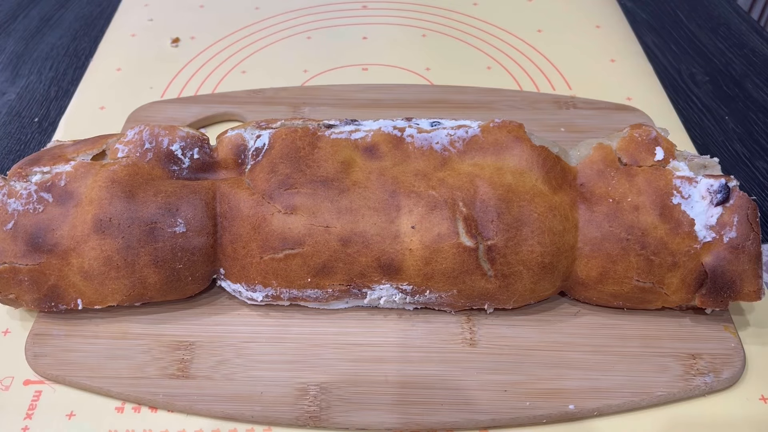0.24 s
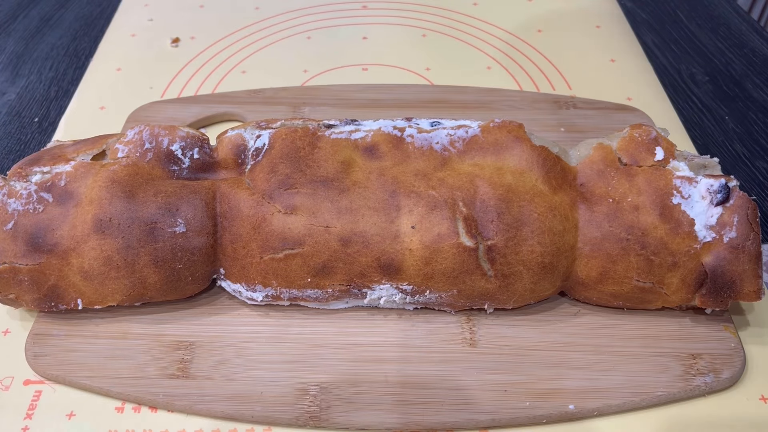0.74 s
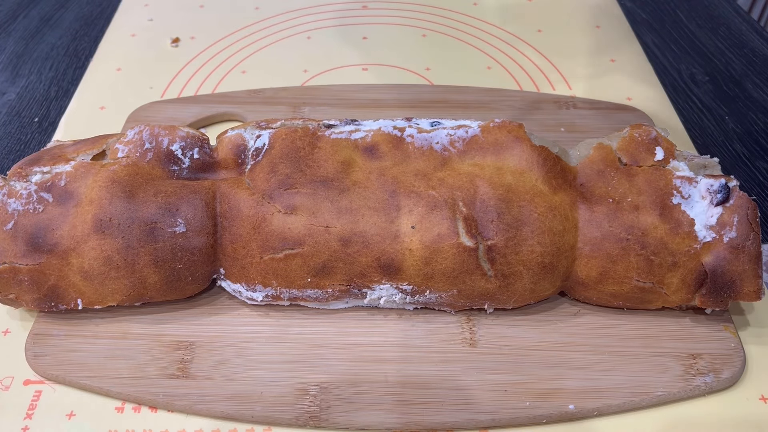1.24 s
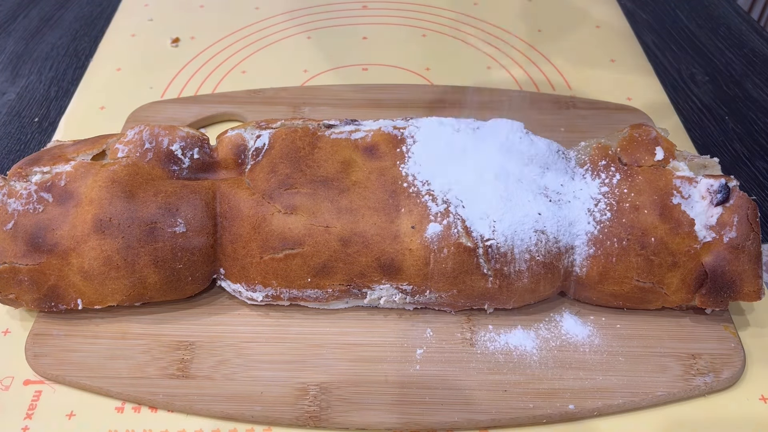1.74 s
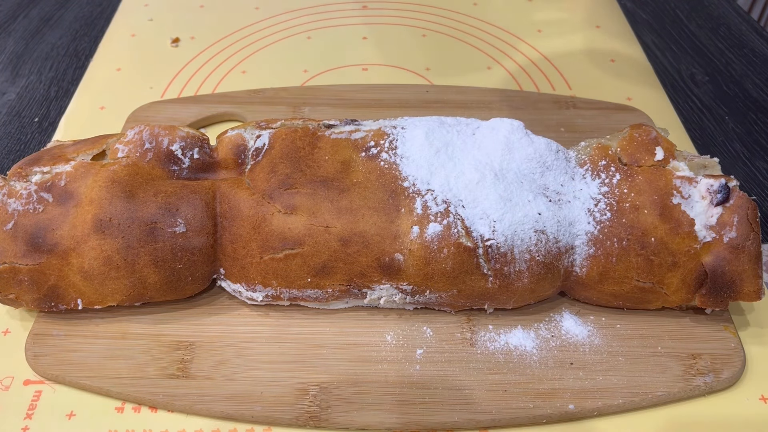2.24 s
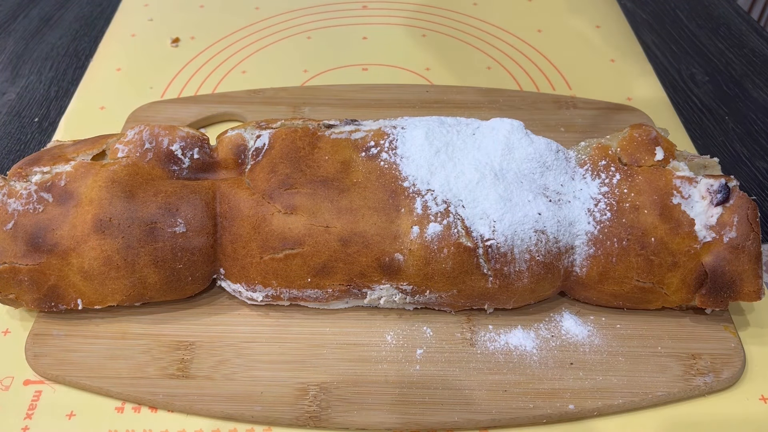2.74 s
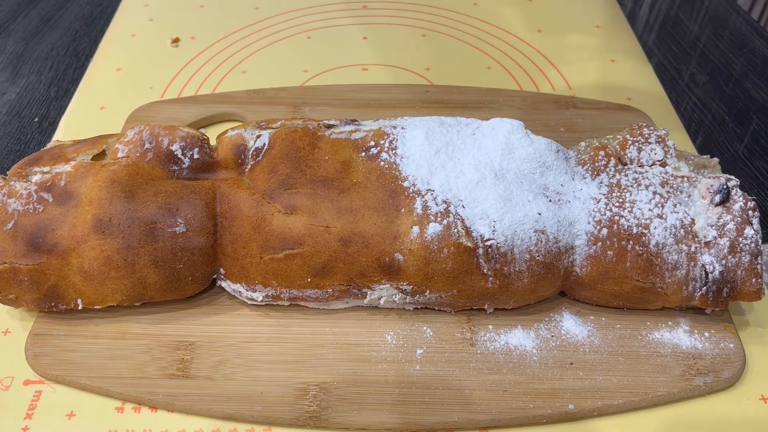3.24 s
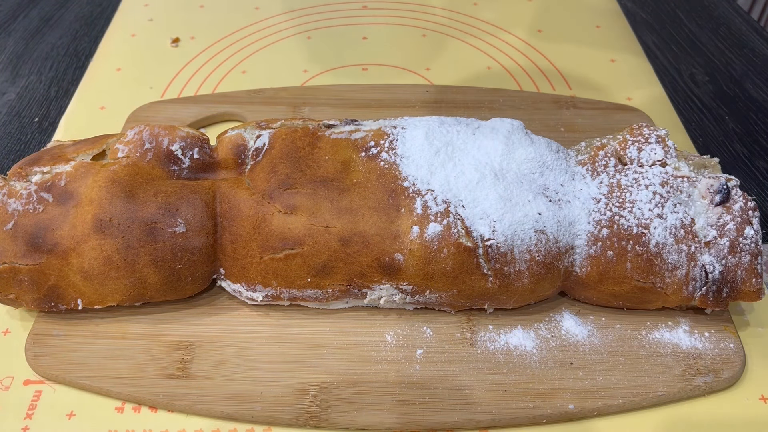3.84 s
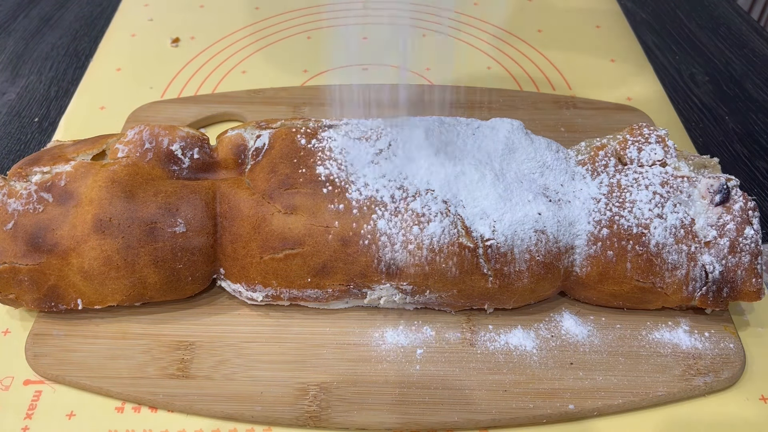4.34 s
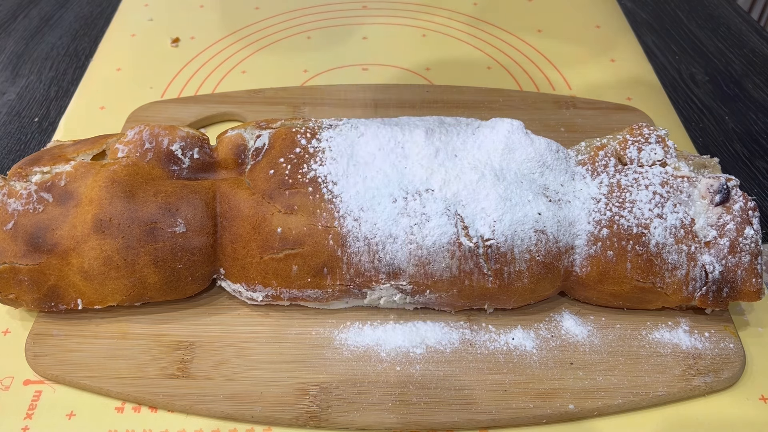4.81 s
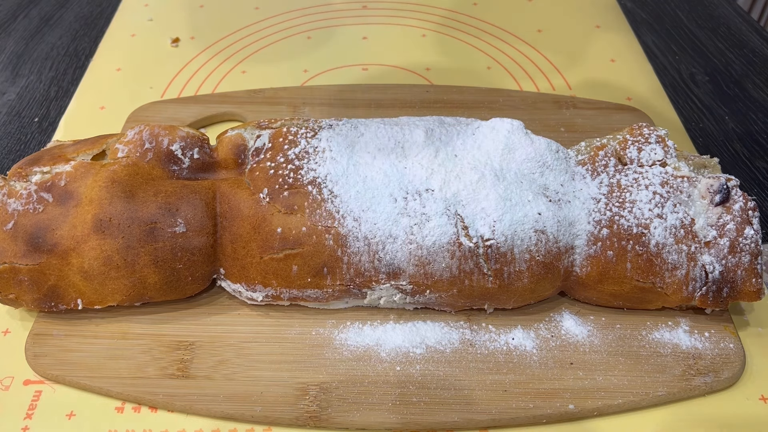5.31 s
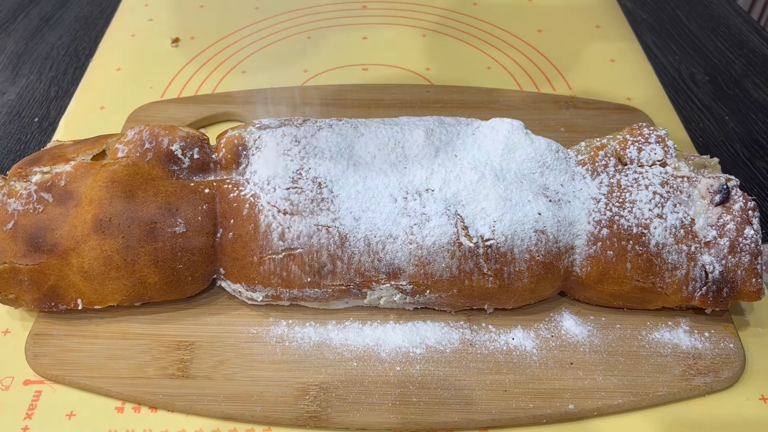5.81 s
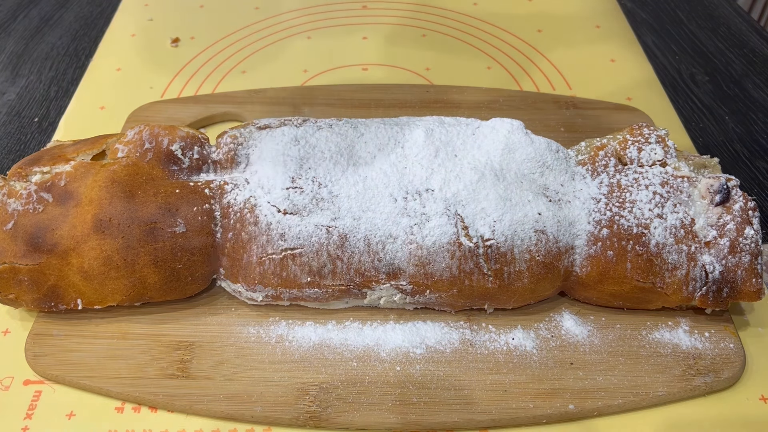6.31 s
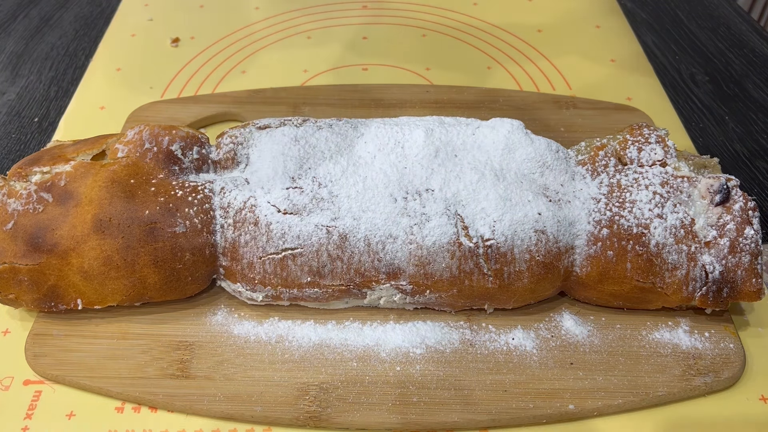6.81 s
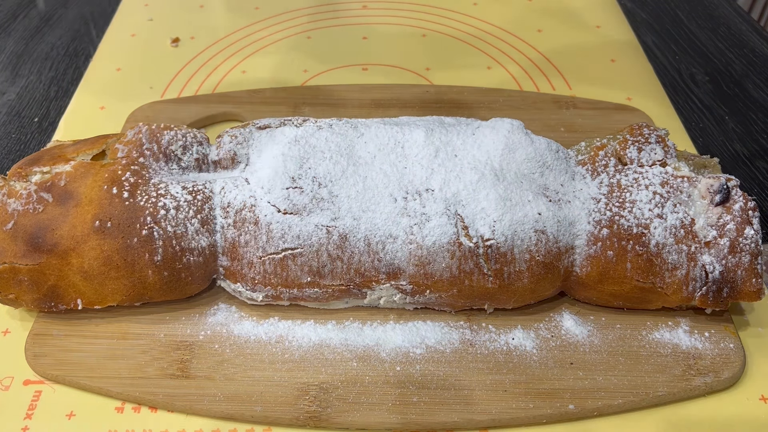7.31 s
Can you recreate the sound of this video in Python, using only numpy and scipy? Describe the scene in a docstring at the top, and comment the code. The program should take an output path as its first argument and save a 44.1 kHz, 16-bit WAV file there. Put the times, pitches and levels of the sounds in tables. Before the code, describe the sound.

A small metal sifter is tapped a few times, then shaken in steady uneven light clicks and rattles with grainy sugar hiss, close in a kitchen.

```python
"""In a kitchen, close above a phone's two microphone ports: first cloth and hands rustle and scuff, with two dull bumps.
From 1.1 s a small metal sugar sifter is tapped, and from 2.7 s shaken to and fro over a baked roll, drifting left.
Each jolt is a ragged push that rings cup, rim and mesh, with a grainy skitter of sugar and loose parts around it.
Sliding sugar hisses over the mesh and swishes along the rim; near the end the rustle and a scuff return.
A quiet hum, shaped noise from the left, runs throughout. Table levels are those before the microphone response."""
import sys
import numpy as np
from scipy import signal
from scipy.fft import rfft, irfft, next_fast_len
from scipy.io import wavfile
from scipy.ndimage import map_coordinates

SR = 44100
rng = np.random.default_rng(int(sys.argv[2]) if len(sys.argv) > 2 else 0)


def int16_out(signal):
    """Quantize to a 16-bit WAV file."""
    q = np.round(np.clip(np.atleast_2d(signal).T, -1, 1) * 32767)
    wavfile.write(sys.argv[1], SR, q.astype(np.int16))


N = 333396


def amp(db):
    """Amplitude factor for a level in dB."""
    return 10 ** (np.asarray(db) / 20)


def unit(x):
    """Scale to an rms of 1."""
    return x / np.sqrt(np.mean(x ** 2) + 1e-20)


def along(points, hz):
    """Read (f/Hz, value) points on a log frequency axis."""
    f, values = np.transpose(points)
    return np.interp(np.log(hz + 1), np.log(f + 1), values)


def curves(rows):
    """One value per sample for each column after the time."""
    times, *columns = np.transpose(rows)
    return np.array([np.interp(np.arange(N) / SR, times, column) for column in columns])


def spans(tables):
    """Gains from (t/s, level/dB) tables that each cover a stretch of time, silent between."""
    t = np.arange(N) / SR
    total = 0
    for rows in tables:
        to_nearest_end = np.minimum(t - rows[0][0], rows[-1][0] - t)
        inside = np.clip(to_nearest_end / .02 + .5, 0, 1)  # 20 ms fades
        total = total + amp(curves(rows)) * inside
    return total


def wobble(rate):
    """A smooth random curve with rate knots a second."""
    knots = rng.standard_normal(int(N * rate / SR) + 4)
    return map_coordinates(knots, [np.arange(N) * rate / SR])


def filtered(x, response):
    """Multiply the spectrum of x by a complex response of frequency."""
    m = next_fast_len(x.shape[-1] + 4096)
    return irfft(rfft(x, m) * response(np.fft.rfftfreq(m, 1 / SR)), m)[..., :x.shape[-1]]


def resonances(table, hz):
    """One causal response for each (f/Hz, width/Hz, level/dB) row, signs alternating."""
    centre, width, db = np.transpose(table)[:, :, None]
    signs = (-1) ** np.arange(len(table))[:, None]
    return signs * amp(db) * 1j * hz * width / (centre * centre - hz * hz + 1j * hz * width)


# strokes of the sifter: t/s, strength level/dB, cup over rim level/dB, sharpness (mesh over strength) level/dB
JOLTS = [(1.133, -43, 6, -2), (1.16, -51.5, 14, -4), (1.192, -40, 3, 12.5), (1.212, -34, 25, 2),
         (1.226, -44.5, -1, 17), (1.271, -38, 10, 6), (1.379, -44, -3, 0), (1.399, -26, 7, -1.5),
         (1.427, -35.5, 5, 4.5), (1.451, -46.5, 0, 10), (1.669, -42.5, 8, 1), (1.681, -32, 9, 2),
         (1.72, -27.5, 25, 3), (1.791, -45, -1, 8), (1.818, -22.5, 15, 4.5), (1.836, -38, 4, -5),
         (1.851, -32.5, -9, 11), (2.658, -42.5, -11, -6), (2.681, -35.5, 9, 4), (2.763, -43, -15, 14),
         (2.8, -39.5, 6, 2), (2.811, -36.5, 10, 4.5), (2.92, -36, -3, -23), (3.001, -42.5, -11, 16),
         (3.046, -40, 8, 3.5), (3.149, -42.5, 0, -14), (3.222, -48.5, -17, 10), (3.28, -36, -5, 14.5),
         (3.349, -41, -1, 1.5), (3.435, -38, -28, 9), (3.458, -39, -25, -1), (3.491, -30.5, -0.5, 15),
         (3.553, -39, -10, 3.5), (3.606, -42.5, 28, -2), (3.679, -32, -35, 6.5), (3.723, -36, 7, 21),
         (3.73, -38, 2, 4), (3.793, -46.5, -7, 0), (3.835, -41, 17, -4.5), (3.944, -37.5, -17, 7.5),
         (3.973, -29.5, 8, 10), (3.977, -27.5, 3, 12.5), (3.996, -34.5, 14, -4), (4.095, -31.5, 11, 10.5),
         (4.106, -41.5, 12, 19), (4.119, -30, 18, 3), (4.138, -32.5, 30, 2), (4.179, -45, -13, -3),
         (4.213, -35.5, -2, 3), (4.222, -25, 5, 12.5), (4.244, -36, -4, 5), (4.316, -43.5, 21, -3),
         (4.335, -43.5, 27, 10), (4.438, -32.5, -31, 2), (4.448, -40, -17, -1), (4.475, -35, 1, -4),
         (4.571, -44.5, -8, -15), (4.611, -44, 16, 7.5), (4.686, -38.5, -35, 6), (4.695, -35.5, -33, -6),
         (4.727, -37, 1, 1), (4.743, -27.5, -19, 7.5), (4.765, -40, -16, 5), (4.803, -37, 3, 8),
         (4.886, -28, -34, 2.5), (4.931, -27, -21, 13.5), (4.974, -36, -21, 1), (5.076, -35.5, -37, -2),
         (5.084, -41, -23, 11), (5.121, -37.5, 4, -13), (5.14, -47, 2, 1), (5.177, -40.5, -4, -12),
         (5.224, -37, 4, 10.5), (5.32, -40, -34, 3), (5.361, -30, 1.5, 3.5), (5.431, -40.5, 5, 3.5),
         (5.504, -49, 18, 9), (5.569, -44, -24, 6.5), (5.613, -37.5, 0, 7), (5.638, -44, -33, -3),
         (5.78, -41, -16, 0), (5.799, -32.5, -1, 10), (5.851, -38.5, -17, -5), (5.893, -41.5, 20, -1),
         (5.91, -42.5, 11, 10.5), (5.985, -41.5, -33, 6.5), (6.04, -33.5, 5, 1.5), (6.111, -31.5, 5, 3.5),
         (6.184, -35, -27, 1), (6.195, -41.5, -16, 12), (6.237, -35, 4, -4.5), (6.27, -43, -14, -9),
         (6.377, -44.5, -27, -33), (6.468, -35.5, 4, -3.5), (6.507, -40, -11, -11), (6.554, -48, 5, 3.5),
         (6.567, -50.5, 12, -4), (6.631, -40, -31, -1), (6.67, -34, -10, -0.5), (6.686, -33, 5, 8),
         (6.753, -38, 20, -5.5), (6.763, -41.5, 7, -4), (6.827, -41.5, -35, 3), (6.888, -40.5, -9, -12),
         (6.904, -41.5, 7, -24), (6.984, -36.5, 6.5, 0), (7.041, -42.5, 0, -4), (7.074, -39, -22, 1),
         (7.096, -29.5, 0, 1), (7.124, -33.5, -24, -10), (7.175, -50.5, 17, 7), (7.239, -32.5, -41, -7),
         (7.281, -35.5, 4, 2), (7.29, -27, -1.5, 3), (7.341, -36.5, -16, -15), (7.394, -40, 14, 0.5),
         (7.489, -35, -31, -6.5), (7.5, -45, -28, -5), (7.546, -41.5, -3, -9)]
# ringing modes of the metal cup: f/Hz, width f/Hz, level/dB
CUP_MODES = [(743, 330, -6.5), (936, 113, -4.5), (1100, 260, -7.5), (1630, 107, 0), (1837, 206, -0.5),
             (2330, 440, -5)]
# ringing modes of the rim: f/Hz, width f/Hz, level/dB
RIM_MODES = [(3087, 315, -6.5), (3754, 156, -9.5), (4290, 136, -11.5), (4644, 110, -3.5), (5227, 290, -6)]
# ringing modes of the wire mesh: f/Hz, width f/Hz, level/dB
MESH_MODES = [(6330, 160, -11.5), (7140, 440, -13.5), (7806, 80, -3.5), (8486, 220, -4), (9080, 190, -3.5),
              (9776, 140, -8), (10940, 150, -6.5), (11620, 103, -7), (12770, 1000, -16), (14600, 180, -24),
              (14730, 290, -21.5)]
# changing tone: t/s, cup's low ring in the skitter level/dB, lower rim modes level/dB, top mesh modes level/dB
TONE = [(1.1, 8, 22, 1), (1.8, 15, 3, 2), (2.7, 10, 10, -7), (3.5, -5, -4.5, -1.5), (4.3, 23, 0.5, 2.5),
        (4.5, -13, -5, 2), (5, 1.5, -7, 4.5), (5.8, -4, -2, -1.5), (6.5, 15, -7.5, -1.5),
        (7.5, 16.5, -11.5, -6)]
# colour of the loose sugar grains: f/Hz, level/dB per Hz
SUGAR = [(250, -8.5), (500, -6), (1400, -11), (1800, -3.5), (2700, -5), (4700, -1), (6000, -8.5),
         (8800, -3.5), (12000, -26), (13500, -26), (15600, -9.5), (16000, -30), (16600, -42)]
# share of the left-right level step, which also scales the side of loose sugar: f/Hz, share
STEER = [(300, 0), (1000, 0.94), (3000, 0.6), (6500, 1), (8500, 0.017)]
MEDIUM_DB = -35  # strength of a medium jolt
# skitter level at a medium, even jolt (dB); its growth per dB of strength, of sharpness, of cup over rim
SKITTER_DB, SKITTER_GROWS, SKITTER_SHARP, SKITTER_LEAN = -49, 0.65, 0.27, -0.02


def jolts():
    """A push of a few ms rings three parts at new strengths, amid a grainy skitter; mid and side.
    Below the treble every mode beams its own way."""
    out, t = np.zeros((2, N + SR)), np.arange(6144) / SR
    hz = np.fft.rfftfreq(len(t), 1 / SR)
    ahead_s = .025  # the skitter's run-up before the push
    after = np.maximum(t - ahead_s, 0)
    sugar = amp(along(SUGAR, hz)) * [hz > 0, 0.67 * along(STEER, hz)]
    soft_cut = (1j * hz / (450 + 1j * hz)) ** 3  # a small cup radiates no bass
    parts = [(np.transpose(modes)[0], resonances(modes, hz) * soft_cut)
             for modes in (CUP_MODES, RIM_MODES, MESH_MODES)]
    tone_times, *tone_columns = np.transpose(TONE)
    for s, strength_db, lean_db, sharp_db in JOLTS:
        hollow_db, low_db, top_db = [np.interp(s, tone_times, column) for column in tone_columns]
        # cup and rim share the power of the blow
        shares_db = -10 * np.log10(1 + amp([-2 * lean_db, 2 * lean_db]))
        part_db = [*(strength_db + shares_db), strength_db + sharp_db]
        skitter_db = SKITTER_DB + SKITTER_GROWS * (strength_db - MEDIUM_DB)
        skitter_db += SKITTER_SHARP * sharp_db + SKITTER_LEAN * lean_db

        # noise in uneven steps of 32 samples
        graininess_db = 4.6 * np.repeat(rng.standard_normal(len(t) // 32), 32)
        grains = rng.standard_normal(len(t)) * amp(graininess_db)
        run_up = amp(-7.5 + 60 * (t - ahead_s) / 0.034)  # grains already stir as the stroke speeds up
        die_away = amp(-60 * (t - ahead_s) / 0.16)
        skitter = rfft(grains * np.where(t < ahead_s, run_up, die_away))

        ring, tails = np.zeros((2, 2, len(t)))
        # push_s: time for the push on cup, rim or mesh to fall 60 dB
        for (centre, rings), db, push_s in zip(parts, part_db, (.009, .018, .005)):
            push = rng.standard_normal(len(t)) * amp(-60 * after / push_s) * (1 - np.exp(-after / 0.0011)) ** 2
            hollow = amp(hollow_db * (centre < 1000))
            tone_db = low_db * (abs(centre - 3300) < 600) + top_db * (centre > 10500)
            gain = amp(tone_db + 3.23 * rng.standard_normal(len(centre)))
            beam = 0.36 * rng.standard_normal(len(centre)) * (centre < 8000)
            mid_side = np.array([gain, gain * beam])
            click = irfft(mid_side @ rings * rfft(push))
            tail = irfft(mid_side * hollow @ rings * skitter)  # rolling grains sound the hollow of the cup
            ring += amp(db) * click / np.max(np.abs(click[0]))
            tails += amp(0.59 * db) * tail / np.std(tail[0])  # leans towards the part struck hardest

        # free grains ring no mode
        scattered = irfft(skitter) * rng.choice([-1, 1], (2, len(t)))
        loose = irfft(sugar * rfft(scattered))
        tails = tails / np.std(tails[0]) + 0.51 * loose / np.std(loose[0])
        tails /= np.std(tails[0, SR // 40:SR // 20])  # level taken over the first 25 ms of the push
        start = round((s - ahead_s - .0006) * SR)
        out[:, start:start + len(t)] += ring + amp(skitter_db) * tails
    return out[:, :N]


# sugar sliding on the mesh, one list per stretch: t/s, level/dB
SLIDE = [
    [(1.1, -88), (1.204, -61), (1.292, -64.5), (2.05, -77.5)],
    [(2.62, -90.5), (2.75, -67.5), (3.29, -62), (3.55, -86), (3.77, -60.5), (4.19, -64), (4.52, -68),
     (4.92, -65.5), (5.67, -64), (6.07, -62.5), (6.29, -81), (6.66, -63.5), (7.2, -77.5), (7.56, -73)],
]


def sliding():
    """Sugar grains hiss over the mesh in uneven spurts, coloured by the whole sifter; mid and side."""
    spurts = amp(2.5 * wobble(40) + 3 * wobble(300))

    def colour(hz):
        metal = np.abs(resonances(CUP_MODES + RIM_MODES + MESH_MODES, hz).sum(axis=0))
        body = amp(along(SUGAR, hz)) * (1 + 0.15 * metal)
        return body * [hz > 0, .5 * along(STEER, hz)]

    mid, side = filtered(spurts * rng.standard_normal((2, N)), colour)
    return spans(SLIDE)[0] * np.array([mid, side]) / np.std(mid)


# sugar heaps swishing along the rim: t/s, length t/s, level/dB before the flutter
SWISHES = [(3.935, 0.036, -50), (4.673, 0.051, -50), (5.543, 0.057, -55.5), (5.727, 0.048, -58.5),
           (5.982, 0.048, -53.5), (6.418, 0.07, -59), (6.843, 0.083, -59), (7.065, 0.036, -47.5),
           (7.245, 0.068, -56), (7.486, 0.058, -50.5)]


def swishes():
    """Soft fluttering humps of hiss in the upper rim modes; mid and side."""
    t = np.arange(N) / SR
    humps = np.zeros(N)
    for s, length, db in SWISHES:
        humps += amp(db) * np.sin(np.pi * np.clip((t - s) / length, 0, 1)) ** 0.56
    hiss = filtered(rng.standard_normal((2, N)), lambda hz: resonances(RIM_MODES[2:], hz).sum(axis=0))
    return humps * amp(3.9 * wobble(200)) * unit(hiss) * [[1], [.35]]


# the sifter drifts left: t/s, left over right level/dB at a full share of the step
PLACE = [(1.1, 1.5), (4.55, 1.5), (7.56, 6.5)]
# phase between the two microphone ports: f/Hz, left leads by phase/rad
LEAD = [(20, 0), (1640, -.3), (3530, .7), (4740, -.3), (7750, .5), (8500, 0), (10200, -np.pi),
        (12000, -2 * np.pi), (13700, -3 * np.pi), (15400, -4 * np.pi), (17000, -5 * np.pi)]


def ports(mid, side):
    """The phone steers levels below the treble; above, the ports differ almost only in phase."""
    x, step_db = np.array([mid + side, mid - side]), 6
    turn = lambda hz: np.exp(np.outer([.5j, -.5j], along(LEAD, hz)))
    steered = lambda hz: turn(hz) * amp(np.outer([.5, -.5], step_db * along(STEER, hz)))
    centre = filtered(x, turn)
    left = filtered(x, steered)
    share = curves(PLACE)[0] / step_db
    return centre + share * (left - centre)


# left-right likeness of far sound: f/Hz, correlation
ALIKE = [(60, 0.96), (290, 0.9), (640, 0.18), (3000, 0.35), (8000, 1)]
# decay of the kitchen's answer: f/Hz, 60 dB decay t/s
KITCHEN = [(500, 0.46), (3000, 0.25), (12000, 0.033)]


def walls(x):
    """Each frequency of the kitchen's answer dies at its own speed; the treble reaches both ports alike."""
    hz, t, (mid, side) = signal.stft(rng.standard_normal((2, SR // 3)), SR, nperseg=256)
    turn = np.arccos(np.clip(along(ALIKE, hz), -1, 1))[:, None] / 2
    mid, side = mid * np.cos(turn), side * np.sin(turn)
    decay = amp(-60 * t / along(KITCHEN, hz)[:, None])
    tail = signal.istft(np.array([mid + side, mid - side]) * decay, SR, nperseg=256)[1]
    delayed = np.pad(x, ((0, 0), (150, 0)))  # 3.4 ms
    return signal.fftconvolve(delayed, tail / np.linalg.norm(tail[0]), axes=1)[:, :N]


def rush(spectrum, alike):
    """Stereo noise of rms 1 with a given spectrum and left-right likeness."""
    turn = lambda hz: np.arccos(np.clip(along(alike, hz), -1, 1)) / 2
    colour = lambda hz: amp(along(spectrum, hz)) * [np.cos(turn(hz)), np.sin(turn(hz))]
    mid, side = filtered(rng.standard_normal((2, N)), colour)
    return unit(np.array([mid + side, mid - side]))


# hands scuffing the worktop: t/s, length t/s, body level/dB, hiss level/dB, at the crest before the folds
SCUFFS = [(0.1, 0.11, -54, -58), (0.162, .18, -57, -88), (0.468, 0.12, -63.5, -87),
          (0.618, 0.26, -64.5, -71), (0.883, 0.28, -62.5, -85), (6.647, 1, -64, -87)]
# colour of a scuff's body: f/Hz, level/dB per Hz
SCUFF_BODY = [(300, -18), (640, -1), (1100, -0.5), (2200, -7.5), (4000, -15.5), (9000, -29.5), (16000, -90)]
# colour of a scuff's hiss: f/Hz, level/dB per Hz
SCUFF_HISS = [(2000, -20), (4000, 8), (9000, -2), (12000, -21), (16000, -15)]
SCUFF_RISE = 0.36  # share of the length spent swelling


def scuffs():
    """Each scuff swells, then fades; a dull body and a thin hiss."""
    t = np.arange(N) / SR
    body, hiss = np.zeros((2, N))
    for s, length, body_db, hiss_db in SCUFFS:
        swell = np.interp(t, [s, s + SCUFF_RISE * length, s + length], [0, 1, 0])
        body += amp(body_db) * swell
        hiss += amp(hiss_db) * swell
    return body * rush(SCUFF_BODY, ALIKE) + hiss * rush(SCUFF_HISS, ALIKE)


# low rustle of cloth and hands, one list per stretch: t/s, level/dB before the folds
RUSTLE = [
    [(0, -67.5), (0.14, -60.5), (0.31, -57), (0.45, -68), (0.6, -62), (0.78, -60.5), (1.05, -65.5),
     (1.3, -69)],
    [(6.3, -79), (6.45, -63.5), (7.0, -58), (7.56, -59.5)],
]
# colour of the low rustle: f/Hz, level/dB per Hz
RUSTLE_LOW = [(30, -30), (55, -1), (100, -3.5), (220, -0.5), (400, -5.5), (800, -9.5), (2000, -50)]


def rustling():
    """Cloth and hands rustle low and scuff, all made uneven by random folds."""
    folds = amp(2 * wobble(30))
    return folds * (spans(RUSTLE) * rush(RUSTLE_LOW, ALIKE) + scuffs())


# soft bumps on the worktop: t/s, peak level/dB, f/Hz
KNOCKS = [(0.135, -45.5, 610), (0.95, -51.5, 345)]


def knocks():
    """Dull bumps: a burst of noise in one steep resonance."""
    out, t = np.zeros(N), np.arange(SR // 6) / SR
    for s, db, hz in KNOCKS:
        burst = rng.standard_normal(len(t)) * amp(-60 * t / 0.41) * (1 - np.exp(-t / 0.001))
        bump = filtered(burst, lambda f: resonances([(hz, 0.41 * hz, 0)], f)[0] ** 2)
        out[round(s * SR):][:len(t)] += amp(db) * bump / np.max(np.abs(bump))
    return out


# colour of the kitchen air: f/Hz, level/dB per Hz
HUM = [(33, -54), (42, -0.5), (55, -14.5), (65, -2), (87, -8.5), (172, -7), (226, -4.5), (320, -8.5),
       (500, -21), (830, -25), (2000, -16.5), (3200, -21.5), (3600, -18.5), (5500, -22), (8500, -32),
       (12500, -42), (14000, -58)]
# the air comes from the left: f/Hz, left over right level/dB
HUM_SIDE = [(830, 0.5), (2000, 11.5), (3500, 7), (5000, 6), (6500, 9), (8500, 1)]
HUM_DB = -67  # rms before the tilt to the left
HUM_LAG_S = .000245  # the air reaches the left port later


def hum():
    """Steady kitchen air that reaches the left port louder but later."""
    def slant(hz):
        tilt = amp(np.outer([.5, -.5], along(HUM_SIDE, hz)))
        return tilt * np.exp(np.outer([-1j, 1j], np.pi * hz * HUM_LAG_S))

    return amp(HUM_DB) * filtered(rush(HUM, ALIKE), slant)


def scene():
    """The sifter close to the ports, its answer from the walls, then the cook and the kitchen behind."""
    sifter = ports(*(jolts() + sliding() + swishes()))
    return sifter + amp(-11.5) * walls(sifter) + rustling() + knocks() + hum()


def record(dry):
    """The phone lowers all by 2 dB, fades the top treble and keeps nothing from 16.6 kHz up."""
    return filtered(dry, lambda hz: amp(along([(15600, -2), (16000, -18)], hz)) * (hz < 16600))


dry = scene()
out = record(dry)
int16_out(out)
```